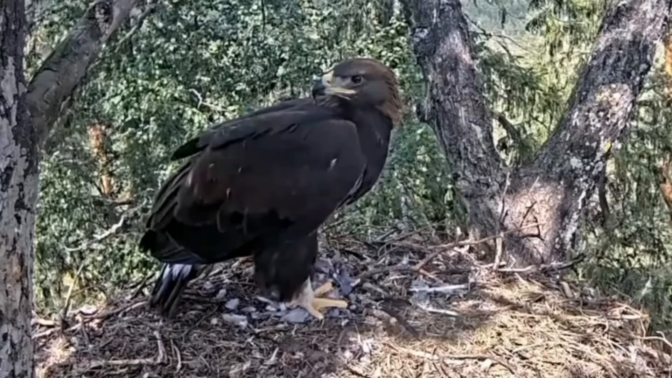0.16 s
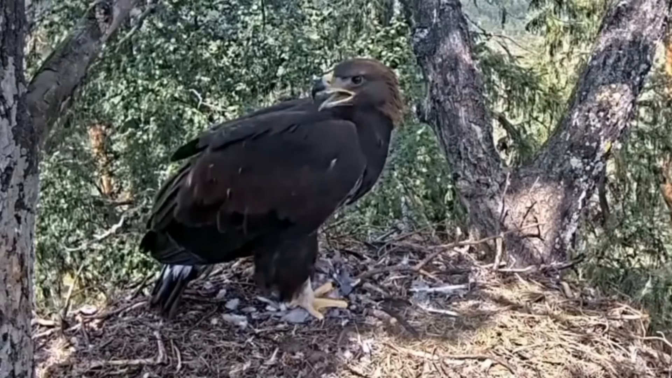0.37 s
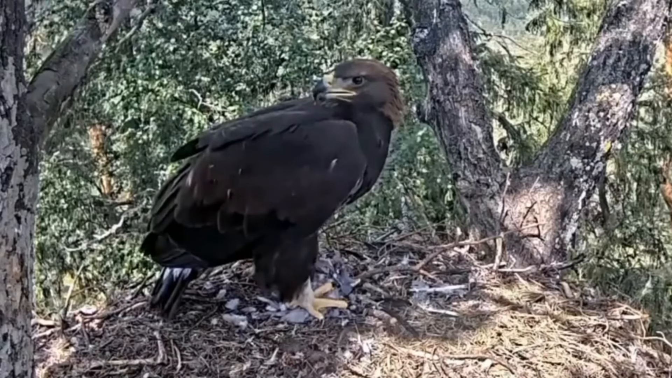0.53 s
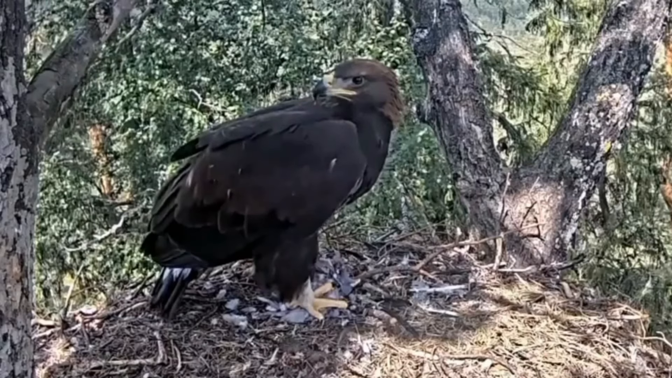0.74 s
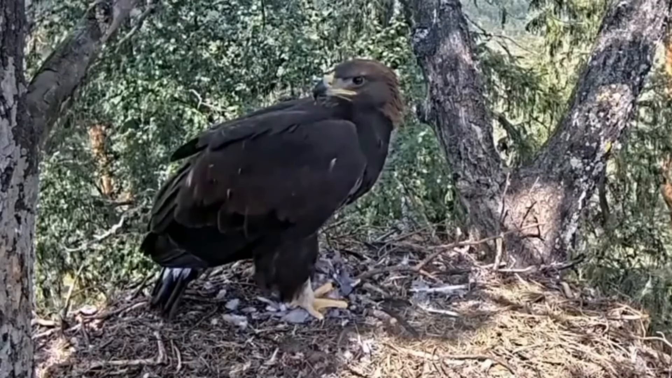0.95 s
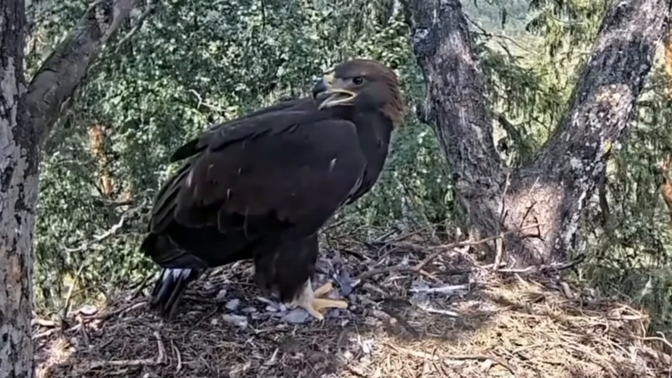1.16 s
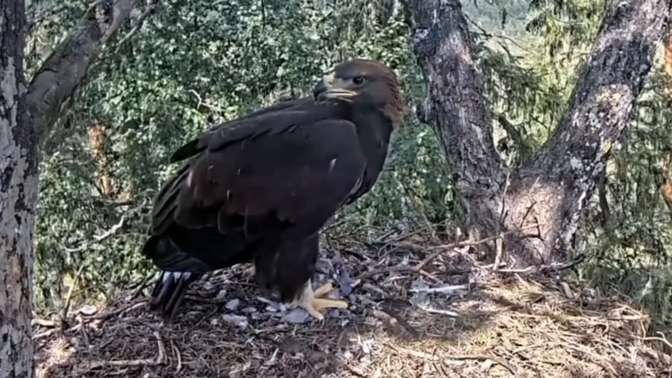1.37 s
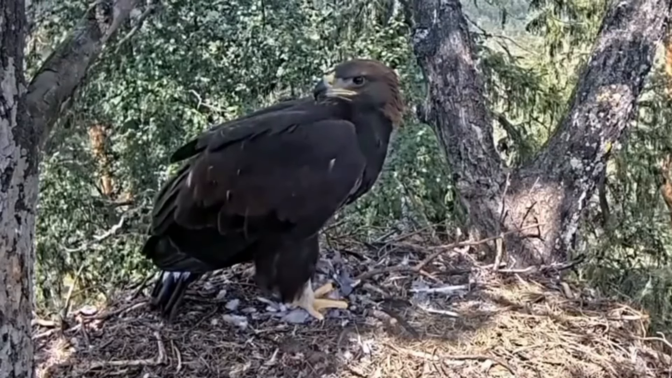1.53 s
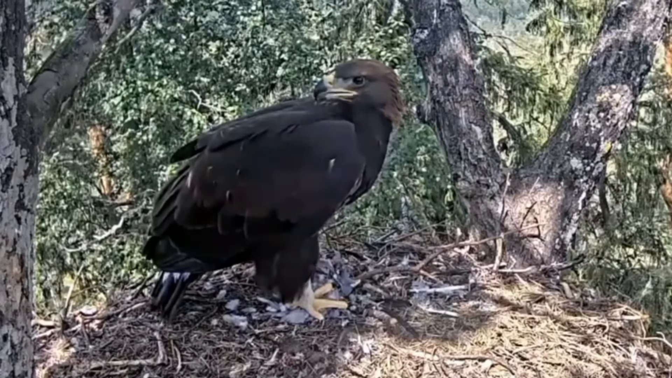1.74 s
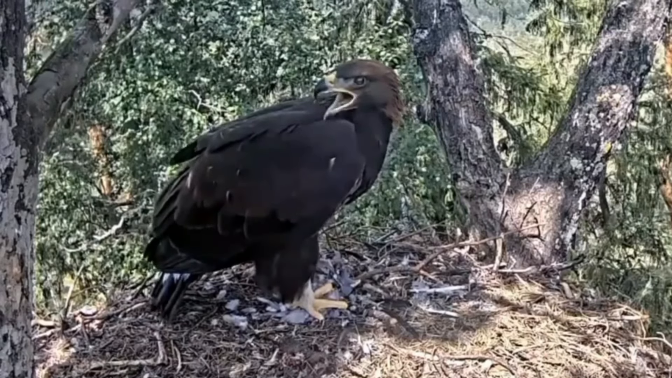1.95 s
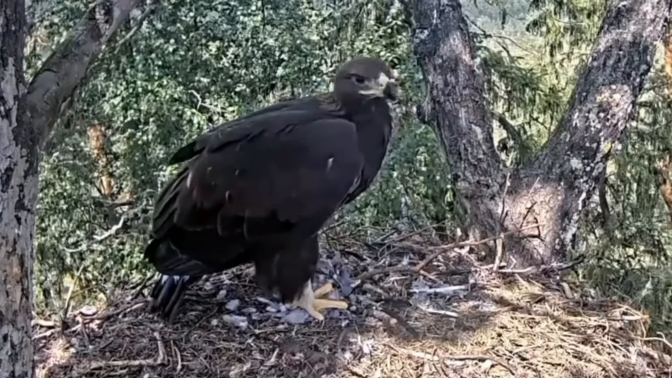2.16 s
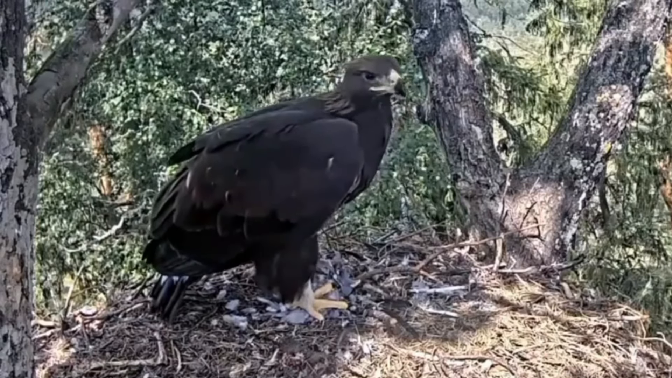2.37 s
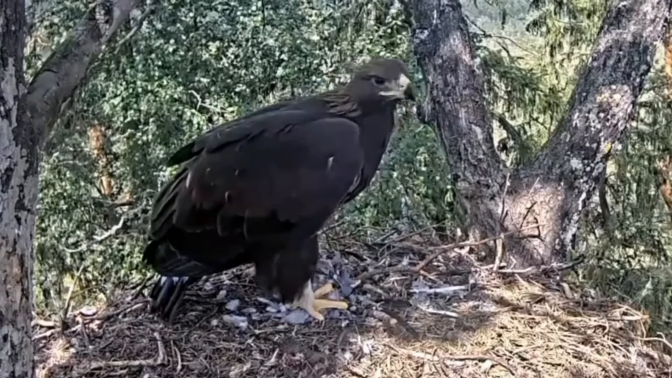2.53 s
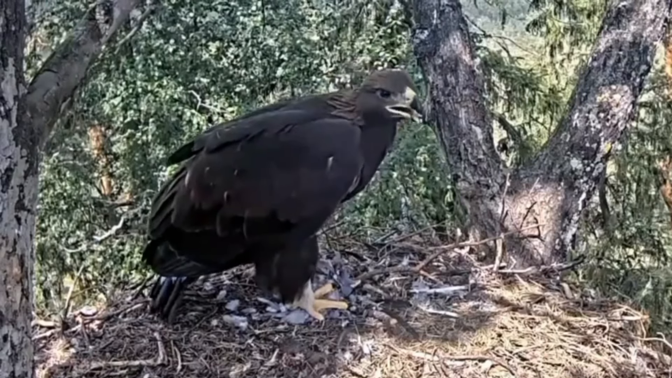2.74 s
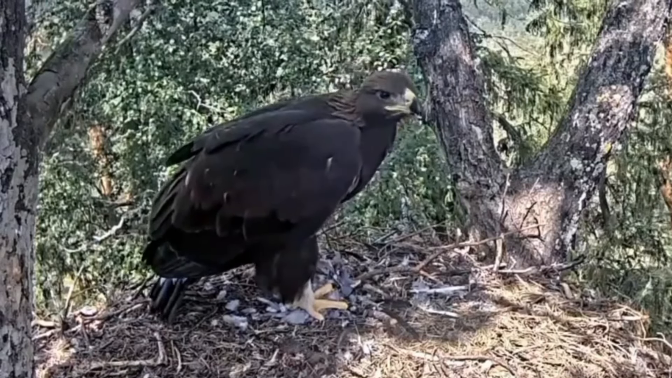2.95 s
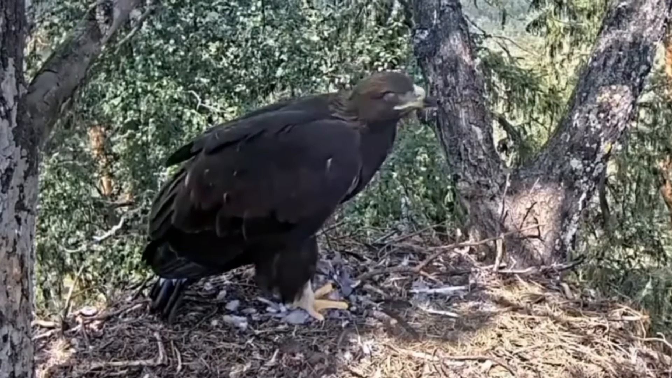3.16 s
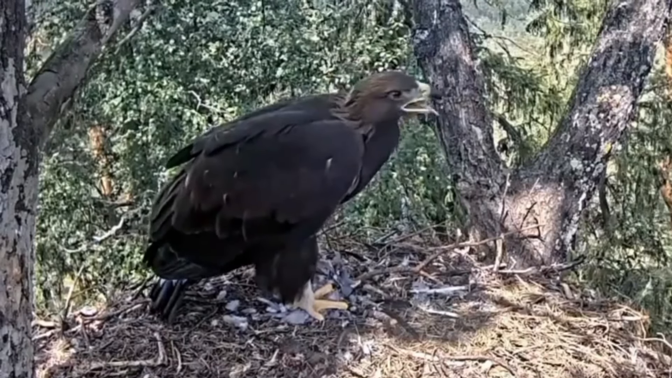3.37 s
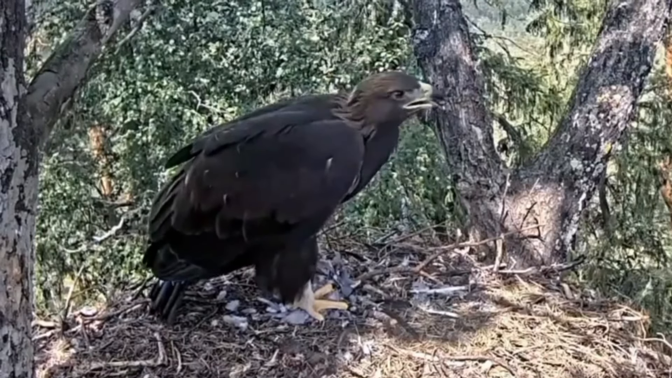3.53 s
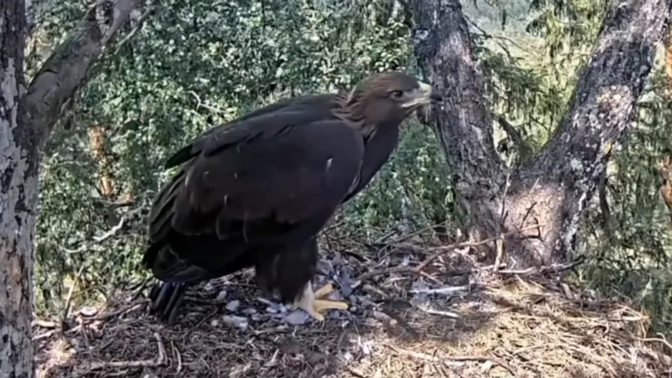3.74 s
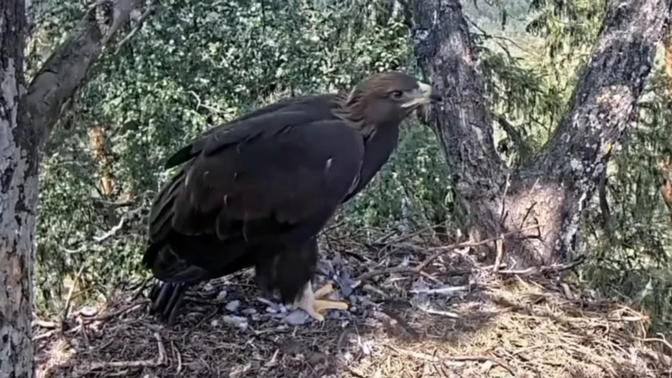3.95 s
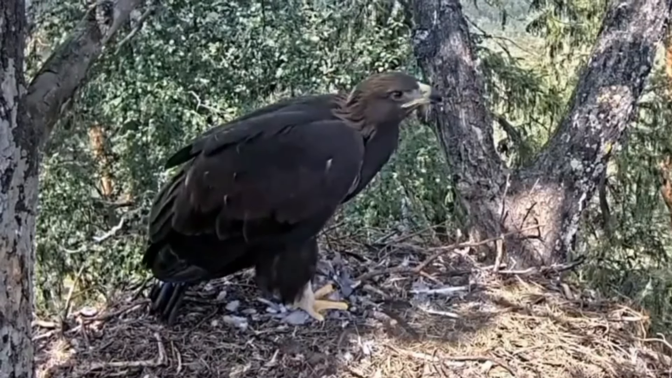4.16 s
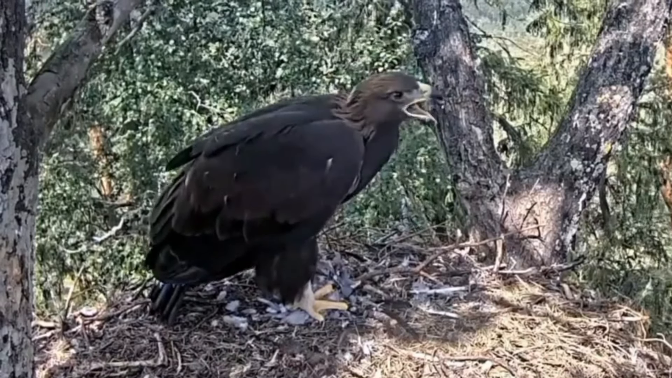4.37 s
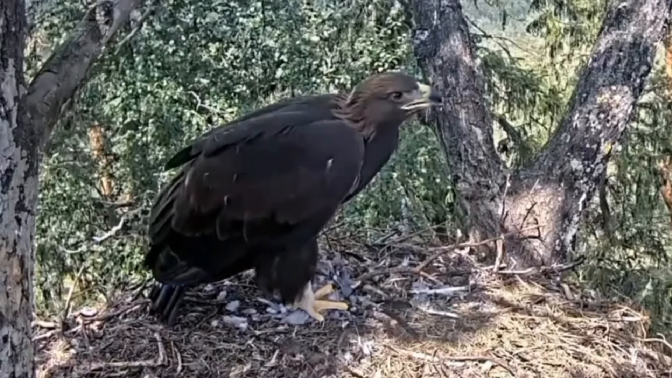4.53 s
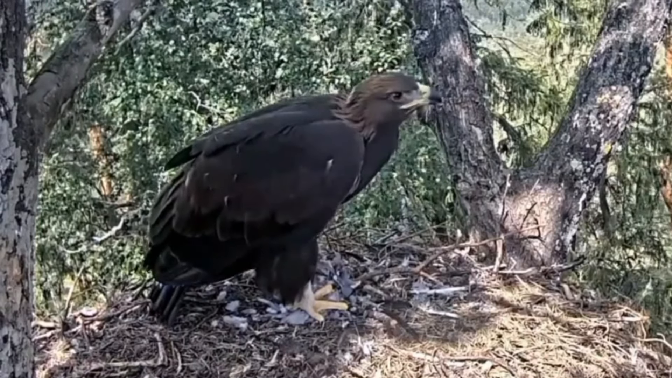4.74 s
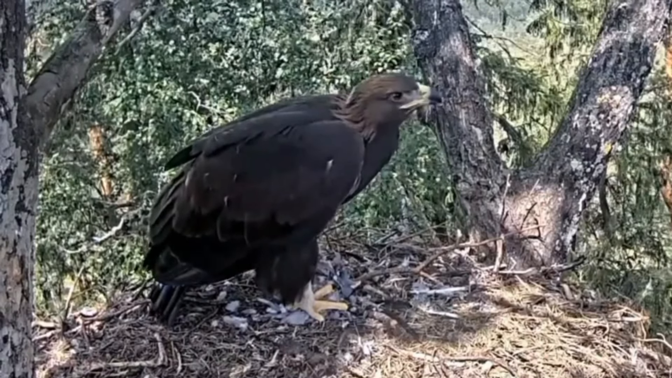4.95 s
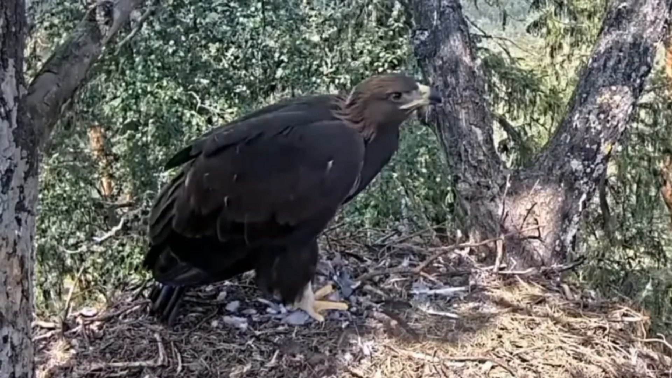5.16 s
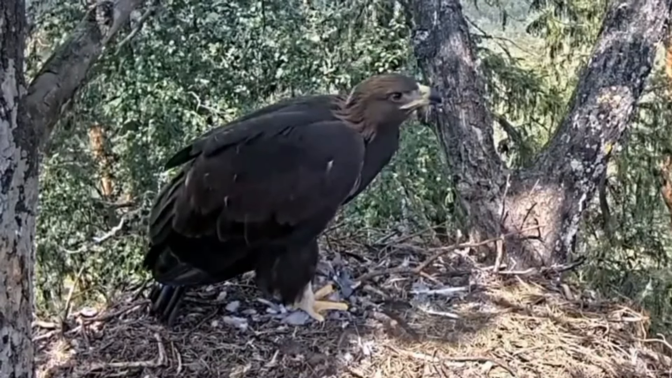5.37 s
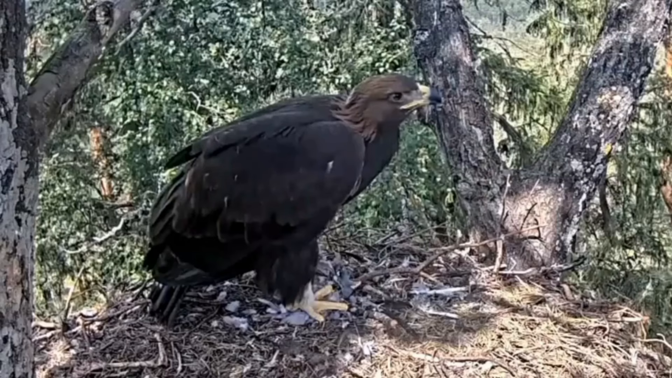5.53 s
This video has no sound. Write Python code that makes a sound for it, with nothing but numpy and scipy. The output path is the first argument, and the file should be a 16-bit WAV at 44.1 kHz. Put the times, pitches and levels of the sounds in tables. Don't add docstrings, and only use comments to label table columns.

```python
import sys
import numpy as np
from scipy import signal
from scipy.fft import rfft, irfft, next_fast_len
from scipy.io import wavfile
from scipy.ndimage import uniform_filter1d

SR = 44100
rng = np.random.default_rng(int(sys.argv[2]) if len(sys.argv) > 2 else 0)


def how_loud(loudness_db):
    steps = np.asarray(loudness_db, float) / 20
    return 10 ** steps


def transcribe(signal):
    frames = np.atleast_2d(signal).T
    limited = np.clip(frames, -1, 1)
    pcm = np.round(limited * 32767).astype(np.int16)
    wavfile.write(sys.argv[1], SR, pcm)


N = 246959
LEAD = SR


def evened(x):
    return x / np.sqrt(np.mean(x ** 2) + 1e-20)


def read(points, hz):
    f, value = np.transpose(points)
    return np.interp(np.log(hz + 1), np.log(f + 1), value)


def add(mix, s, sound):
    part = mix[LEAD + round(s * SR):][:len(sound)]
    part += sound[:len(part)]


def wobble(n, span):
    once = uniform_filter1d(rng.standard_normal(n), span)
    return evened(uniform_filter1d(once, span))


def band(x, hz, width):
    edges = [hz - width / 2, hz + width / 2]
    return signal.sosfilt(signal.butter(3, edges, "band", fs=SR, output="sos"), x)


def leaf_hiss():
    # f/Hz, level/dB
    floor_colour = [(30, -15), (200, -18), (550, -21), (800, -27), (1400, -31), (1520, -38.5),
                    (3000, -38.5), (4600, -37), (4800, -41), (7000, -38), (9000, -43.5), (15500, -46.5)]
    frames, hz = N // 512 + 5, np.fft.rfftfreq(2048, 1 / SR)
    real, imag, patches = rng.standard_normal((frames, 1025, 3)).T
    patches = uniform_filter1d(patches, 20, 0)
    patches = evened(uniform_filter1d(patches, 8, 1))
    z = (real + 1j * imag) * how_loud(read(floor_colour, hz)[:, None] + 0.31 * patches)
    hiss = signal.istft(z, nperseg=2048, noverlap=1536)[1][:N]
    return how_loud(-64) * evened(hiss)


def insects():
    # f/Hz, width/Hz, rms level/dB
    chorus_bands = [(1225, 270, -79), (4420, 470, -84)]
    chorus = np.zeros(N)
    for hz, width, db in chorus_bands:
        noise = evened(band(rng.standard_normal(N), hz, width))
        chorus += how_loud(db + 1.2 * wobble(N, 6000)) * noise
    return chorus


def hum():
    hum_hz = 87.7
    return how_loud(-79 + 2.5 * wobble(N, 8000)) * np.sin(2 * np.pi * hum_hz * np.arange(N) / SR)


def rumble():
    edge_hz = 23.45
    lowpass = signal.butter(6, edge_hz, fs=SR, output="sos")
    low = signal.sosfilt(lowpass, rng.standard_normal(LEAD + N))[LEAD:]
    return how_loud(-61 + 2.5 * wobble(N, 12000)) * evened(low)


def glide(start, end, from_hz, to_hz, peak_db):
    bend = 0.65 * np.pi / 2
    full = 0.3
    u = np.linspace(0, 1, num=40)
    hz = from_hz + (to_hz - from_hz) * np.sin(bend * u) / np.sin(bend)
    fade_in_db = -15 * np.maximum(1 - u / full, 0) ** 2
    thin_out_db = -6 * u ** 4
    octave_db = -28.5 + 12.5 * u + 0.7 * (peak_db + 60)
    return np.transpose([start + (end - start) * u, hz, peak_db + fade_in_db + thin_out_db, octave_db])


def whistle(course):
    s, hz, db, octave_db = np.transpose(course)
    t = np.arange(s[0], s[-1], 1 / SR)
    wavering_hz = np.interp(t, s, hz) * (1 + 0.0031 * wobble(len(t), 60))
    phase = 2 * np.pi * np.cumsum(wavering_hz) / SR
    fuzz = 1 + 0.5 * wobble(len(t), 45)
    tone = fuzz * np.sin(phase) + how_loud(np.interp(t, s, octave_db)) * np.sin(2 * phase)
    level = how_loud(np.interp(t, s, db) + 3.5 * wobble(len(t), 500))
    return s[0], level * tone * signal.windows.tukey(len(t), 0.1)


def far_bird():
    # start/s, end/s, from/Hz, to/Hz, peak level/dB
    bird_notes = [
        (.02, .28, 6800, 6920, -82),
        (4.17, 4.27, 6750, 6520, -83),
        (3.542, 3.572, 7200, 7480, -68),
        (.905, .955, 6160, 6120, -80),
        (3.645, 3.68, 7500, 7250, -70),
    ]
    mix = np.zeros(LEAD + N)
    for row in bird_notes:
        add(mix, *whistle(glide(*row)))
    return mix[LEAD:]


def pop(t):
    snap = np.exp(-(t / 0.00015) ** 2) - 0.5 * np.exp(-((t - 0.0003) / 0.0002) ** 2)
    ring = 0.8 * (t > 0) * np.exp(-abs(t) / 0.0022) * np.sin(2 * np.pi * 2300 * t)
    puff = 0.12 * np.exp(-(t / 0.0006) ** 2)
    return snap + ring + puff


def opening(s, hz, pip_db, pop_s, pop_db):
    t = np.arange(-0.005, 0.016, 1 / SR)
    pip = np.exp(-(t / 0.0022) ** 2) * np.sin(2 * np.pi * hz * t * (1 - 9 * t))
    return s - 0.005, how_loud(pip_db + 2) * pip + how_loud(pop_db - 4) * pop(t - (pop_s - s))


def high_course(start, brk, held_hz, sag, peak_db):
    t = np.linspace(0, brk - start, num=80)
    left = t[-1] - t
    u = t / t[-1] / 0.74
    scoop_hz = 350 * np.exp(-(t / 0.0072) ** 2)
    slip_hz = 55.6 * np.exp(-left / 0.007)
    hz = held_hz - sag * t + scoop_hz - slip_hz
    swell_db = (-25 - peak_db) * np.maximum(1 - u, 0) ** 1.4
    ebb_db = -1.5 * (3 * np.maximum(u - 1, 0)) ** 2
    attack_db = -18 * np.exp(-(t / 0.007) ** 2.3)
    cut_db = -15 * np.exp(-left / 0.0022)
    return np.transpose([start + t, hz, peak_db + swell_db + ebb_db + attack_db + cut_db])


def low_course(brk, settled_hz, fall_hz, peak_db, fade_db, lead):
    before_s, top_s, last_s = 0.006, 0.005, 0.058
    t = np.linspace(-lead, last_s, num=100)
    flip_hz = 100 / (1 + np.exp(t / 0.0022 - 1))
    hz = settled_hz + flip_hz - fall_hz * (1 - np.exp(-np.maximum(t, 0) / 0.025))
    rise_db = -30 * np.maximum((top_s - t) / (top_s + before_s), 0) ** 2
    murmur_db = -17 + 9 * np.minimum(t, 0) / lead
    fade = np.maximum((t - top_s) / (last_s - top_s), 0) ** 1.354
    return np.transpose([brk + t, hz, peak_db + np.maximum(rise_db, murmur_db) + fade_db * fade])


def note(course, partials, lift_db, top_db, breath_db):
    # f/Hz, level/dB
    beak = [(5000, 2), (6500, 15), (7300, 1), (8300, -2), (9000, -14.5), (9700, -0.5), (12000, -1.5)]
    # f/Hz, width/Hz, level/dB
    windpipe = [(1366, 85, -25), (2370, 420, -36.5), (3299, 240, -37), (4300, 520, -41), (7560, 500, -55.5),
                (7460, 6000, -51.5)]
    s, hz, db = np.transpose(course)
    t = np.arange(s[0], s[-1] + 0.002, 1 / SR)
    hz, db = np.interp(t, s, hz), np.interp(t, s, db)
    phase = 2 * np.pi * np.cumsum(hz * (1 + 0.001 * wobble(len(t), 40))) / SR
    weak_db = np.maximum.accumulate(db) - db.max()
    tone = np.sin(phase)
    for k, partial_db in partials:
        effort_db = 0.23 * (abs(k - 1) + 8 * (k % 1)) * weak_db
        level_db = partial_db + lift_db + (k > 2) * top_db + effort_db + read(beak, k * hz)
        level_db += min(k, 3) * wobble(len(t), 250)
        tone += (k != 1) * how_loud(level_db) * np.sin(k * phase + k)
    air = rng.standard_normal(len(t))
    breath = np.zeros(len(t))
    for f, width, ring_db in windpipe:
        flutter_db = 3.23 * wobble(len(t), 300)
        breath += how_loud(ring_db + breath_db + flutter_db) * evened(band(air, f, width))
    leak = how_loud(-0.5 * weak_db)
    shut = np.clip((t[-1] - t) / 0.003, 0, 1) * np.clip((t - s[0]) / 0.002, 0, 1)
    return s[0], how_loud(db) * (tone + leak * breath) * shut


def eagle():
    # start/s, end/s, from/Hz, to/Hz, peak level/dB
    rises = [
        (0.227, 0.37, 3650, 4840, -65),
        (0.962, 1.109, 3493, 5770, -61),
        (1.691, 1.72, 3560, 3760, -69.5),
        (1.707, 1.813, 4050, 5490, -57.5),
        (2.467, 2.602, 3580, 5460, -58.5),
        (3.403, 3.531, 3594, 5330, -60.5),
        (0.252, 0.402, 4860, 6256, -69.5),
    ]
    # pip/s, pip f/Hz, pip level/dB, pop/s, pop level/dB
    openings = [
        (.3686, 4330, -36, .3717, -40),
        (1.1025, 4280, -35, 1.1058, -39.5),
        (1.8216, 4420, -39, 1.8241, -35),
        (2.608, 4200, -46, 2.61, -36),
        (3.5365, 4450, -48, 3.5391, -36.5),
    ]
    # start/s, break/s, held f/Hz, sag/(Hz/s), peak level/dB
    high_notes = [
        (0.375, 0.445, 1972, 1150, -21.5),
        (1.108, 1.176, 1986, 1150, -21),
        (1.826, 1.898, 1996, 2600, -16),
        (2.615, 2.675, 1986, 1750, -16.5),
        (3.544, 3.599, 1979, 1350, -16.5),
    ]
    # settled f/Hz, fall/Hz, peak level/dB, fade/dB, lead-in/s
    low_notes = [
        (1278.4, 170, -24.5, -27.5, .006),
        (1308.5, 180, -23.5, -23, 0.0069),
        (1317, 250, -18, -32.5, 0.011),
        (1383.5, 295, -15, -26, .022),
        (1404, 285, -15, -23.5, 0.02),
    ]
    # high overtones/dB, low overtones/dB, top overtones/dB, breath/dB
    colours = [
        (3.5, 3.5, -2, -3.5),
        (2.5, 2.5, -2.5, -5.5),
        (-1.5, -2.5, 1, -7.5),
        (-1.5, -6, 0, -7),
        (-1.5, -4.5, -1.5, -8.5),
    ]
    # multiple of the pitch, level/dB
    high_partials = [(.5, -39.5), (1, -1.5), (1.5, -44.5), (2, -22.5), (3, -46.5), (4, -53), (5, -49.5),
                     (6, -57)]
    # multiple of the pitch, level/dB
    low_partials = [(1, -0.5), (2, -17.5), (3, -27), (6, -47.5), (7, -51.5)]
    earlier_s, earlier_db = 0.83, 0.5
    mix = np.zeros(LEAD + N)
    for row in rises:
        add(mix, *whistle(glide(*row)))
    for row in openings:
        add(mix, *opening(*row))
    yelps = zip(high_notes, low_notes, colours)
    for i, (high, low, (high_db, low_db, top_db, breath_db)) in enumerate(yelps):
        brk = high[1]
        snap = how_loud(high[4] - 26.5) * pop(np.arange(-0.001, 0.012, 1 / SR))
        add(mix, brk - 0.002, snap)
        upper = note(high_course(*high), high_partials, high_db, top_db, breath_db)
        lower = note(low_course(brk, *low), low_partials, low_db, top_db, breath_db + 4.5)
        for s, sound in (upper, lower):
            add(mix, s, sound)
            if i == 0:
                add(mix, s - earlier_s, how_loud(earlier_db) * sound)
    return mix


def head_shadow(x):
    # f/Hz, level/dB
    shade = [(3000, 0.5), (4000, -2), (5500, -5.5), (12000, -14)]
    size = next_fast_len(len(x))
    gain = how_loud(read(shade, np.fft.rfftfreq(size, 1 / SR)))
    return irfft(rfft(x, size) * gain, size)[:len(x)]


def echoes(colour, t60, start, rise, spacing):
    taps = np.zeros(2 * SR)
    at = np.arange(round(start * SR), 2 * SR - spacing, spacing)
    taps[at + rng.integers(0, spacing, len(at))] = rng.choice([-1., 1.], len(at))
    taps *= np.clip((np.arange(2 * SR) / SR - start) / rise, 0, 1)
    hz, t, z = signal.stft(taps, SR, nperseg=256)
    z = z * how_loud(-60 * t / read(t60, hz)[:, None])
    energy = np.sqrt((abs(z) ** 2).sum(1) + 1e-20)
    z *= (how_loud(read(colour, hz)) / energy)[:, None] / 148
    return signal.istft(z, SR, nperseg=256)[1]


def wood(x):
    # f/Hz, level/dB; the beak points away, so the trunks get more treble than the camera
    near_colour = [(300, -21.5), (1200, -17.5), (1900, -12.5), (2600, -3.5), (3900, -0.5), (6000, 1.5),
                   (10000, 2)]
    far_colour = [(300, -27.5), (1200, -32), (1900, -30.5), (2600, -18), (3900, -17.5), (6000, -13),
                  (10000, -20.5)]
    # f/Hz, T60/s
    near_t60 = [(1200, 0.49), (1900, 0.35), (2600, 0.34), (4000, .32), (8000, 0.35), (12000, .15)]
    far_t60 = [(1200, 1.8), (1900, 2.3), (2600, 1.5), (4000, 1.3), (9000, .6)]
    near = echoes(near_colour, near_t60, start=0.011, rise=0.0096, spacing=60)
    far = echoes(far_colour, far_t60, start=0.051, rise=0.076, spacing=20)
    return signal.fftconvolve(x, near + far)[:len(x)]


def scene():
    forest_floor = leaf_hiss() + insects() + hum() + rumble()
    small_bird = far_bird()
    bird = eagle()
    calls = (head_shadow(bird) + wood(bird))[LEAD:]
    return (forest_floor + small_bird + calls)[None]


def low_pass(x):
    return signal.sosfilt(signal.butter(12, 15670, fs=SR, output="sos"), x)


def record(dry):
    lowpass = signal.firwin(1023, 15770, window=("kaiser", 8), fs=SR)
    mix = signal.oaconvolve(dry, lowpass[None], "same")
    return low_pass(mix)


dry = scene()
out = record(dry)
transcribe(out)
```